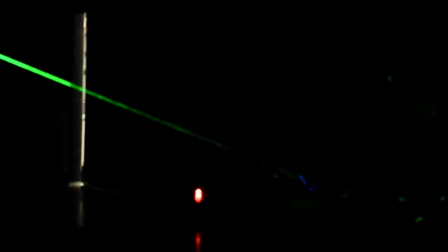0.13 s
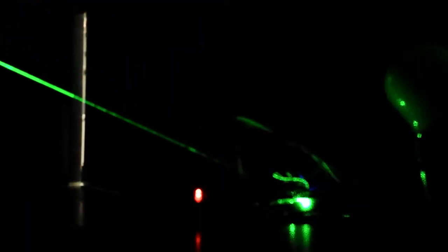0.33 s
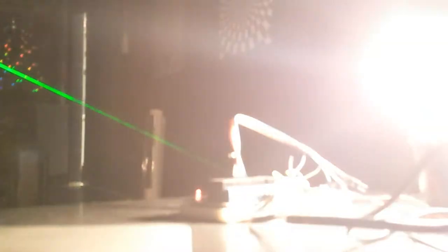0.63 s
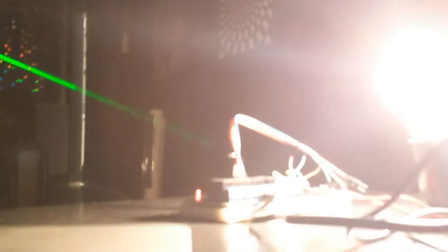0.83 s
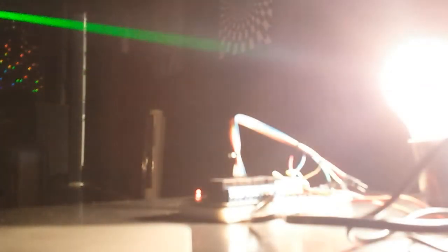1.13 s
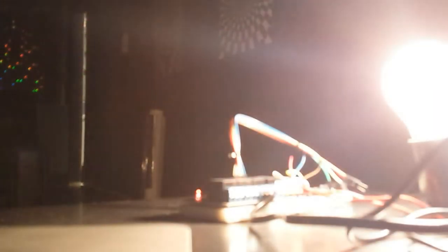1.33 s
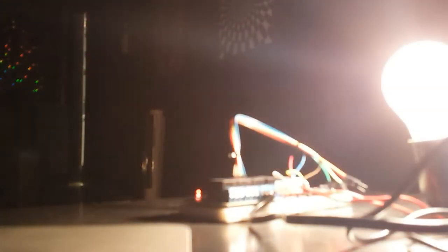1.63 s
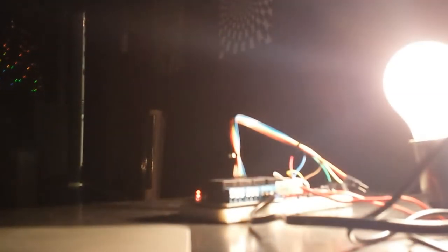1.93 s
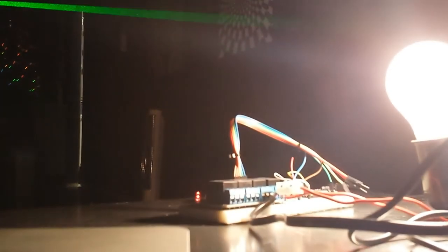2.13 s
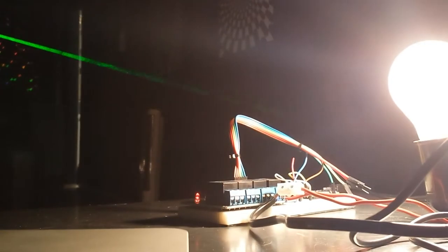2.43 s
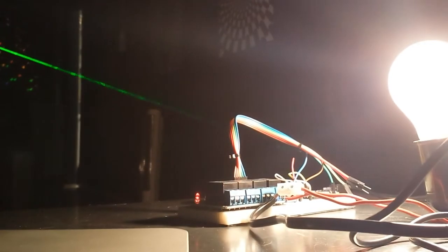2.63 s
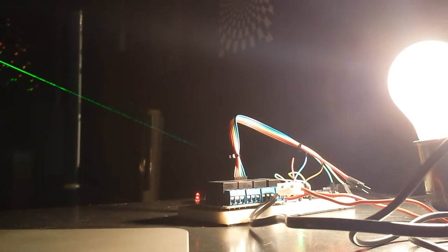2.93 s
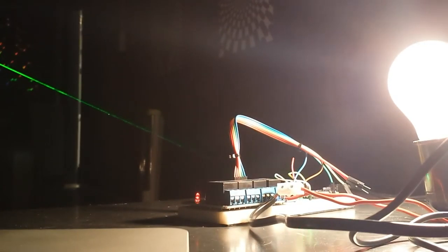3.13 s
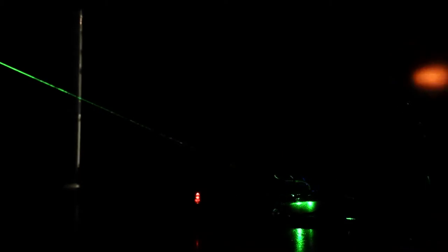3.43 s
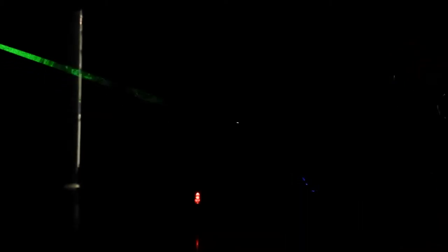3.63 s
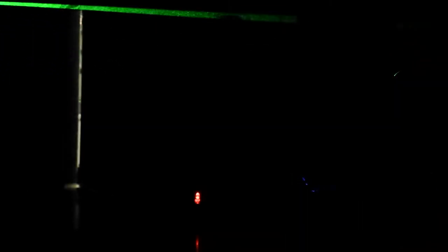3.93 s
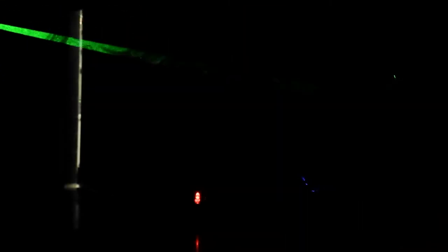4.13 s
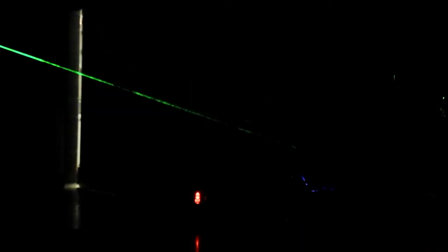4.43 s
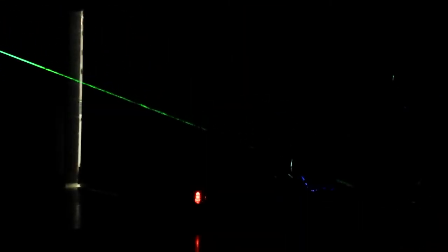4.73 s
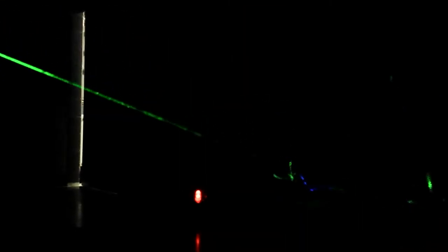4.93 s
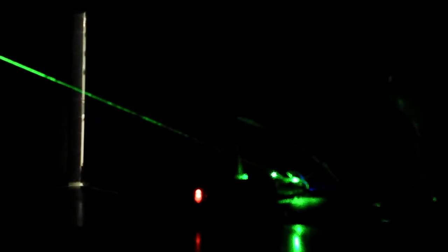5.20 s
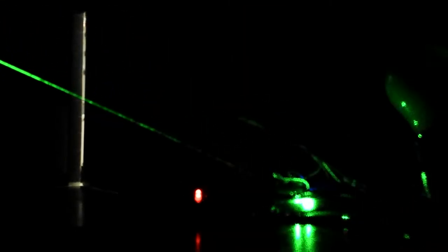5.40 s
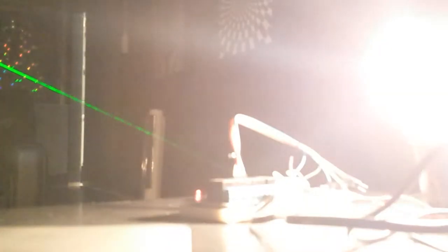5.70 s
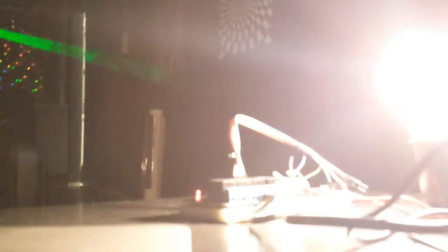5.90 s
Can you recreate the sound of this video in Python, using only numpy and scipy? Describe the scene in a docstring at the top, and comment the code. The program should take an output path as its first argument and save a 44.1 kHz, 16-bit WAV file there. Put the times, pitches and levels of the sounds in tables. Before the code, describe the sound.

A small relay clicks a lamp on, off and on again, each snap briefly ringing in a quiet room with soft ventilation noise.

```python
"""A two-port microphone, with a small relay on a table to its right, in a hard-walled room.
From the start: ventilation whoosh, fan drone, low rumble, narrow hums; whoosh and whine lean left.
Near 0.5 s the relay lights a lamp: armature and contacts strike, bounce and ring short modes.
Near 3.3 s it puts the lamp out and the rumble swells after it; near 5.6 s it lights the lamp again.
Random spectra make whoosh, hums and room; near sines make drone and whine; decaying sines the relay."""
import sys
import numpy as np
from scipy import signal
from scipy.fft import irfft
from scipy.io import wavfile
from scipy.ndimage import uniform_filter1d

SR = 44100
rng = np.random.default_rng(int(sys.argv[2]) if len(sys.argv) > 2 else 0)


def dump_mix(stems):
    """Bounce the given channels to the path in sys.argv[1] as a 16-bit WAV at rate SR."""
    frames = np.atleast_2d(stems).T  # one column per channel
    limited = np.clip(frames, -1, 1)  # hard clip at full scale
    pcm = np.round(limited * 32767).astype(np.int16)
    wavfile.write(sys.argv[1], SR, pcm)


def natural_amplitude(level_db):
    """Convert a level in decibels to a linear amplitude factor, elementwise."""
    exponent = np.asarray(level_db, float) / 20
    return 10 ** exponent


N = 267290  # samples, about 6.06 s


def read(hz_points, values, hz):
    """Reads a table of values along a logarithmic frequency axis."""
    return np.interp(np.log(hz + 1), np.log(np.asarray(hz_points) + 1), values)


def evened(x):
    """Scales a signal to an rms of one."""
    return x / np.sqrt(np.mean(x ** 2) + 1e-20)


def add(mix, s, sound):
    """Lays a sound into the mix from time s, cut off at the end of the mix."""
    part = mix[:, round(s * SR):][:, :sound.shape[1]]
    part += sound[:, :part.shape[1]]


def port_pair(same, shape):
    """Two complex noises, one for each port, that share the part 'same'."""
    a, b = rng.standard_normal((2, *shape)) + 1j * rng.standard_normal((2, *shape))
    same = np.clip(same, -1, 1)
    return np.array([a, same * a + np.sqrt(1 - same ** 2) * b])


# colour of the ventilation: f/Hz, relative level per Hz/dB
AIR_COLOUR = [(15, -36), (30, -18), (60, -12), (120, -6), (300, -9.5), (650, -4), (1000, -4), (1250, -5.5),
              (1900, -8), (2600, -14), (3100, -14), (3800, -18), (4900, -17), (8000, -23), (11000, -28),
              (14500, -27)]
# its lean to the left port: f/Hz, left minus right level/dB
AIR_LEAN = [(60, -1), (99, 9), (160, 14), (270, 8.5), (450, 7.5), (740, 10), (1220, 6.5), (2010, 12),
            (3330, 9.5), (5500, 4.5), (9080, -7.5), (15000, 1)]
# how alike the two ports hear it: f/Hz, left-right likeness (-1 to 1)
AIR_LIKENESS = [(60, 0.38), (99, 0.036), (160, -0.37), (270, 0.21), (450, 0.034), (740, 0.53),
                (1220, -0.28), (2010, -0.088), (3330, 0.095), (5500, -0.12), (9080, 0.091), (15000, -0.1)]


def ventilation():
    """Whoosh and hiss of moving air: random spectra with faint drifting patches."""
    level_db, patches_db = -53, 0.74  # rms of the mean of both ports; rms depth of the patches
    hz = np.fft.rfftfreq(2048, 1 / SR)
    spectra = port_pair(read(*np.transpose(AIR_LIKENESS), hz), (N // 512 + 5, len(hz)))
    patches = uniform_filter1d(rng.standard_normal(spectra.shape[1:]), 12, 0)  # smooth in time
    patches = evened(uniform_filter1d(patches, 16, 1))  # smooth in frequency
    lean_db = read(*np.transpose(AIR_LEAN), hz)
    port_db = np.array([lean_db / 2, -lean_db / 2])[:, None]
    colour_db = read(*np.transpose(AIR_COLOUR), hz) + port_db + patches_db * patches
    frames = (spectra * natural_amplitude(colour_db)).transpose(0, 2, 1)
    sound = signal.istft(frames, nperseg=2048, noverlap=1536)[1][:, :N]
    return natural_amplitude(level_db) * sound / np.std(sound.mean(0))


def narrow_noise(centre_hz, width_hz, same):
    """Noise squeezed through a steep, narrow resonance, at an rms of one over both ports."""
    hz = np.fft.rfftfreq(N, 1 / SR)
    resonance = 1 / (1 + (2 * (hz - centre_hz) / width_hz) ** 2)
    return evened(irfft(port_pair(same, hz.shape) * resonance, N))


def rumble():
    """Low rumble: a band of noise, steady but for one swell."""
    level_db, swell_db = -71, 11.5
    swell_s, swell_length_s = 3.55, 0.32  # peak; half length
    swell = np.exp(-((np.arange(N) / SR - swell_s) / swell_length_s) ** 2)
    return natural_amplitude(level_db + swell_db * swell) * narrow_noise(186, 96, same=0.55)


# narrow hums: f/Hz, width/Hz, left level/dB, right level/dB, left-right likeness
HUM_BANDS = [(90.3, 12, -70, -75, .8), (161, 20, -64, -77, .3), (228, 6, -72, -80, .5),
             (6590, 250, -85, -72, .2), (7406, 4, -100, -90, .2), (10655, 6, -102, -92, .2)]


def hums():
    """Fuzzy narrow hums, each a thin band of noise with its own level at each port."""
    out = np.zeros((2, N))
    for centre_hz, width_hz, left_db, right_db, same in HUM_BANDS:
        port_gain = natural_amplitude(np.array([[left_db], [right_db]]))
        out += port_gain * narrow_noise(centre_hz, width_hz, same)
    return out


def tone(level_db, hz, left_db, right_db, lead, waver_hz):
    """A near sine that wavers slightly in pitch, with a phase lead at the left port."""
    waver = waver_hz * evened(uniform_filter1d(rng.standard_normal(N), 4000))
    phase = 2 * np.pi * np.cumsum(hz + waver) / SR
    ports = [natural_amplitude(left_db) * np.sin(phase + lead), natural_amplitude(right_db) * np.sin(phase)]
    return np.sqrt(2) * natural_amplitude(level_db) * np.array(ports)  # level_db is rms, before the port levels


# the drone at the microphone: f/Hz, left level/dB, right level/dB, lead of left port/rad, waver/Hz
DRONE_AT_PORTS = (90.5, 1.5, -3.5, 0.76, 4)


def fan_drone():
    """Drone of a fan: a low near sine of steady level."""
    return tone(-64, *DRONE_AT_PORTS)


# swelling and fading of the whine: t/s, level/dB before the port levels
WHINE_LEVEL = [(0, -66.5), (.5, -61.5), (.9, -61), (1.9, -62), (2.3, -66.5), (2.8, -65.5), (3, -63),
               (3.5, -59), (3.9, -62.5), (5.6, -62), (6.06, -66.5)]
# the whine at the microphone: f/Hz, left level/dB, right level/dB, lead of left port/rad, waver/Hz
WHINE_AT_PORTS = (1109, 6, -10.5, 1.43, 1.46)


def whine():
    """Thin whine: a near sine that swells and fades."""
    level_db = np.interp(np.arange(N) / SR, *np.transpose(WHINE_LEVEL))
    return tone(level_db, *WHINE_AT_PORTS)


# relay sound sent all round the room:
# f/Hz, pull-in level/dB, drop-out level/dB, left minus right level/dB
ROOM_COLOUR = [(650, -40, -28, 3), (1500, -35, -39, 2), (2400, -28, -40, 1), (3200, -27, -39, -1),
               (4000, -27, -34, 2), (4600, -33, -35, 0), (5130, -27, -19, 4), (5600, -24, -34, 1),
               (6050, -21, -17, 0), (6500, -18, -27, -2), (7200, -16, -13, -3), (7800, -12.5, -18, -8),
               (8350, -23, -20, -7), (9450, -9.5, -21, -10), (10900, -22, -29, -8), (11600, -20, -27, -12),
               (12600, -34, -40, -12), (13900, -18, -40, -13)]
# how long the room rings: f/Hz, t60/s
ROOM_DECAY = [(650, .5), (2800, .72), (6000, .56), (13900, .42)]
# single wall echoes: t/ms, left level/dB, right level/dB, both above the tail
WALL_ECHOES = [(13, 4, -2), (15.2, 0, -10), (30.5, 0, -10)]


def room(column):
    """Answer to one impact: wall echoes in a thickening tail whose bands die at their own speed."""
    lumps_db, lump_s = 2.5, 0.0034  # reflections arrive in uneven clumps
    age = np.arange(round(.7 * SR)) / SR
    hz, t, spectra = signal.stft(rng.standard_normal((2, len(age))), SR, nperseg=256)
    f, db, left_db = np.array(ROOM_COLOUR)[:, [0, column, -1]].T
    colour_db = np.array([read(f, db + left_db, hz), read(f, db, hz)])[:, :, None]
    decay_db = 60 * t / read(*np.transpose(ROOM_DECAY), hz)[:, None]
    tail = signal.istft(spectra * natural_amplitude(colour_db - decay_db), SR, nperseg=256)[1][:, :len(age)]
    growth = np.clip((age - .005) / .01, 0, 1)  # silent for 5 ms, full at 15 ms
    for ms, *echo_db in WALL_ECHOES:
        echo = np.exp(-((age - ms / 1000) / .0009) ** 2)
        growth = growth + natural_amplitude(np.array(echo_db))[:, None] * echo
    lumps = evened(uniform_filter1d(rng.standard_normal(len(age)), round(lump_s * SR)))
    return tail * growth * evened(natural_amplitude(lumps_db * lumps))


# modes of relay and board:
# f/Hz, t60/ms, pull-in level/dB, drop-out level/dB, left minus right level/dB
RELAY_MODES = [(350, 40, -54, -40, 3), (685, 35, -50, -33, 4), (760, 40, -52, -38, 4),
               (1060, 40, -52, -42, 0), (1750, 20, -46, -40, 4), (2400, 18, -29, -48, 4.5),
               (3280, 10, -19, -36, 5.5), (4150, 10, -21, -30, 5), (4850, 10, -33, -7, -7),
               (5480, 14, -14, -6, -7), (6020, 12, -17, -5, -6), (6720, 7, 5, 3, -6),
               (7060, 3.6, 0, -6, -5.7), (7650, 3.6, 10, 10.6, -13.3), (8500, 2.8, 8.5, 11, -13.6),
               (9280, 5.2, 11, 0, -12.1), (10370, 6.4, -7.7, -28, -13), (11270, 8, -29, -21, -12),
               (14060, 3, .2, -21.3, -14.5)]


def switching(impacts, column):
    """Every impact rings all modes, direct to both ports, and draws an answer from the room."""
    rise_ms, left_lag_ms = .243, .085  # onset of each ring; later arrival at the left port
    t = np.arange(round(.12 * SR)) / SR * 1000  # ms
    out = np.zeros((2, SR))
    hz, t60_ms, mode_db, left_db = (np.array(RELAY_MODES)[:, [k]] for k in (0, 1, column, 4))
    for ms, blow_db, bright_db, rattle_ms in impacts:
        ports = np.zeros((2, len(t)))
        # a rattle is a quick run of light touches
        touches = rattle_ms * rng.random(5) if rattle_ms else [0]
        impact_db = blow_db + mode_db + bright_db * np.log2(hz / 8000)
        for touch in touches:
            for port, lag, side_db in zip(ports, (left_lag_ms, 0), (left_db, 0)):
                age = np.maximum(t - ms - touch - lag, 0)
                size = natural_amplitude(impact_db + side_db - 60 * age / t60_ms)
                ring = size * np.sin(2 * np.pi * hz * age / 1000) * (1 - np.exp(-age / rise_ms))
                port += ring.sum(0) / np.sqrt(len(touches))
        add(out, 0, ports)
        # each impact radiates its own way, so it finds its own reflections
        add(out, ms / 1000, natural_amplitude(blow_db) * room(column - 1))
    return out


# impacts as the relay pulls in:
# t/ms after the first, blow level/dB, direct brightness/dB per octave about 8 kHz, rattle length/ms
PULL_IN_IMPACTS = [(0, 0, 0, 0), (.5, -4.2, -1.1, 0), (1.07, -8.5, 1, 0), (3.27, -17.6, 1.8, 0),
                   (4, -21, .7, 0), (6.8, -11.5, 5, 2.4), (24, -22, 3, 2.5)]
# impacts as it drops out: the same columns
DROP_OUT_IMPACTS = [(0, 0, 0, 0), (1.67, -6.2, -3.5, 0), (3.14, -3.9, 8.4, 0), (4.27, -14.5, 5.2, 0),
                    (6.5, -20, 5, 3.5)]
# switchings: t/s, level/dB, lamp lights 1 or goes dark 0
LAMP_SWITCHINGS = [(.51934, -12, 1), (3.32337, -12, 0), (5.62626, -12.3, 1)]


def relay():
    """Pull-in when the lamp lights, drop-out when it goes dark, each a run of impacts."""
    mix = np.zeros((2, N))
    for s, db, lights in LAMP_SWITCHINGS:
        if lights:
            sound = switching(PULL_IN_IMPACTS, column=2)
        else:
            sound = switching(DROP_OUT_IMPACTS, column=3)
        add(mix, s, natural_amplitude(db) * sound)
    return mix


def scene():
    """The relay in its room over the background."""
    background = ventilation() + rumble() + hums() + fan_drone() + whine()
    return background + relay()


def low_pass(x):
    """Removes everything above the highest recorded frequency."""
    return signal.sosfilt(signal.butter(12, 15690, fs=SR, output="sos"), x)


def record(dry):
    """Band limit of the recorder: a steep low-pass filter at 14520 Hz."""
    edge = signal.firwin(767, 14520, window=("kaiser", 6), fs=SR)
    mix = signal.oaconvolve(dry, edge[None], "same")
    return low_pass(mix)


dry = scene()
out = record(dry)
dump_mix(out)
```